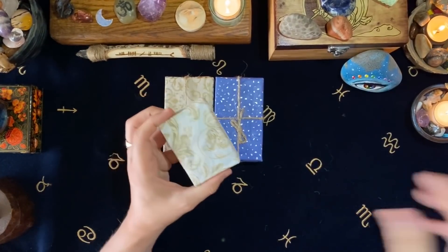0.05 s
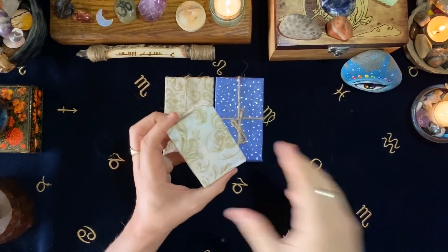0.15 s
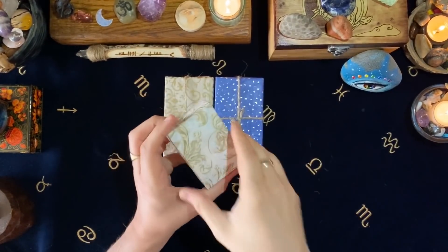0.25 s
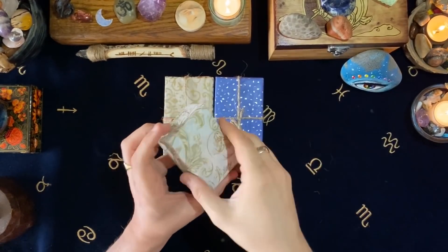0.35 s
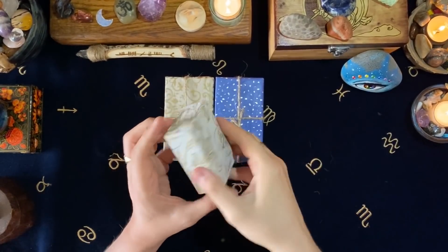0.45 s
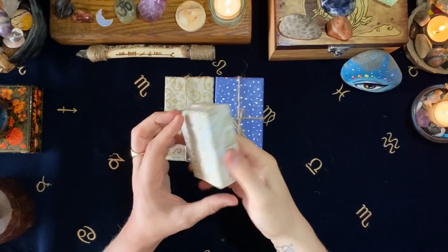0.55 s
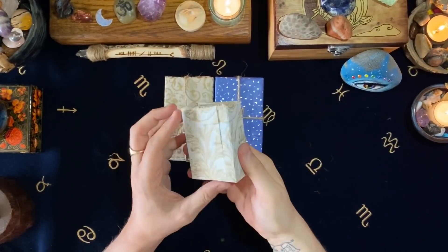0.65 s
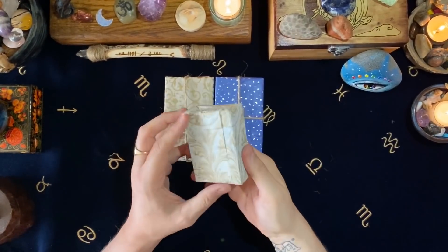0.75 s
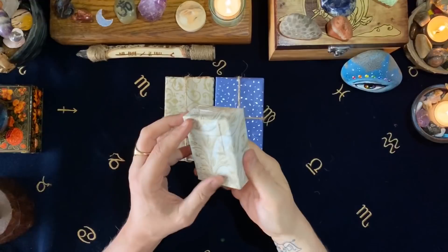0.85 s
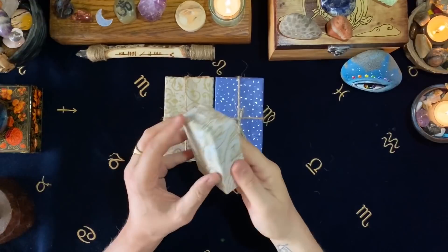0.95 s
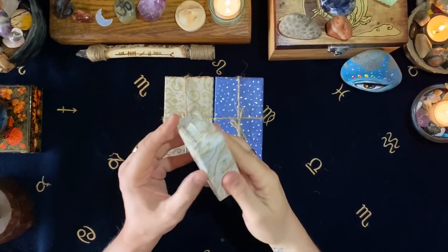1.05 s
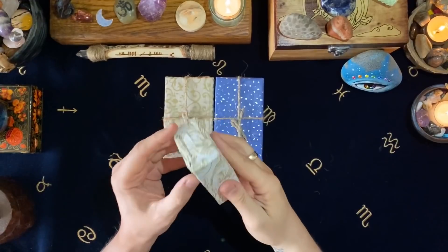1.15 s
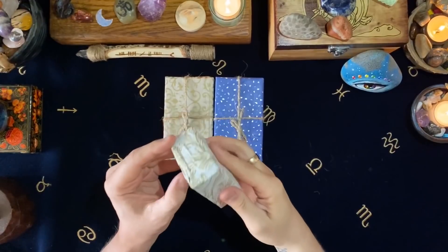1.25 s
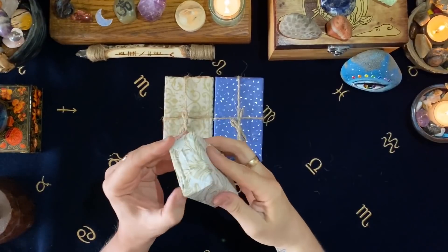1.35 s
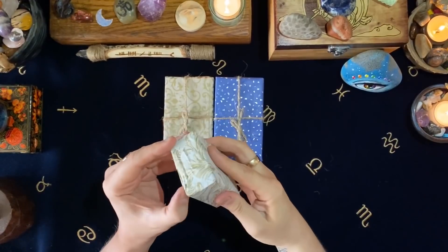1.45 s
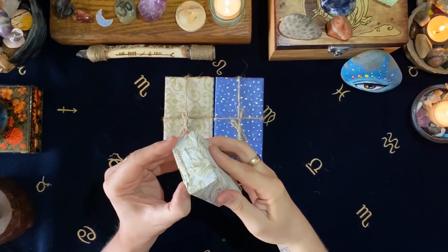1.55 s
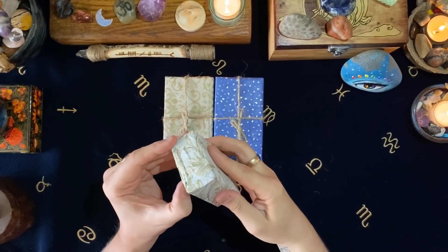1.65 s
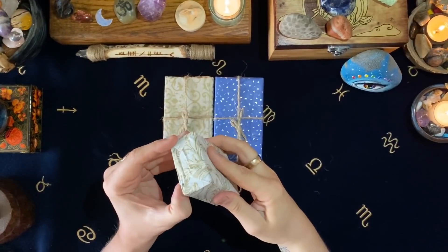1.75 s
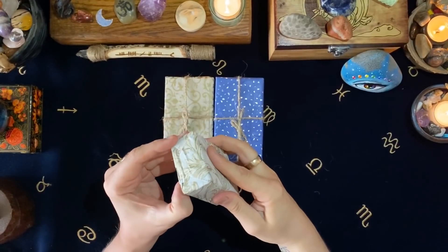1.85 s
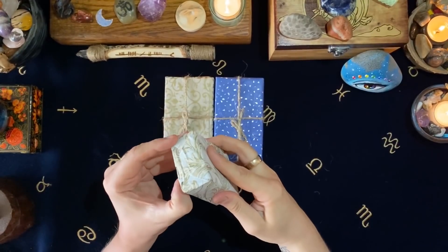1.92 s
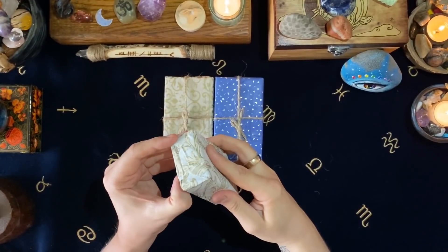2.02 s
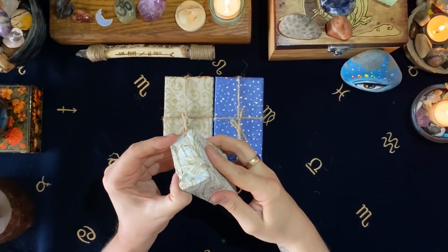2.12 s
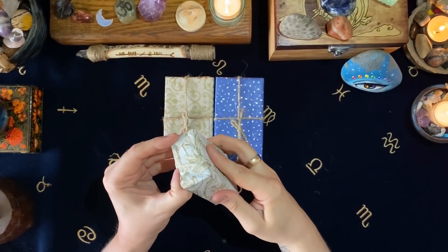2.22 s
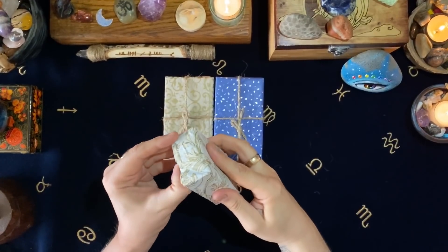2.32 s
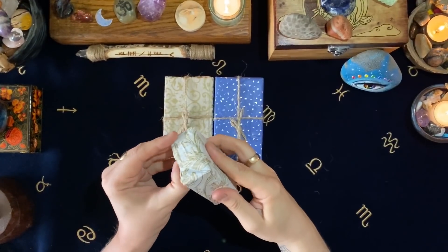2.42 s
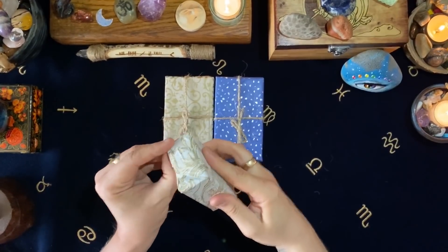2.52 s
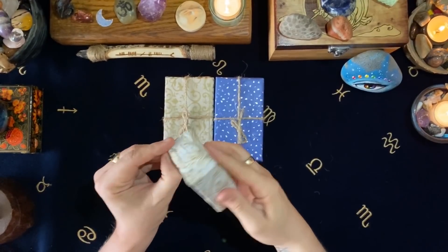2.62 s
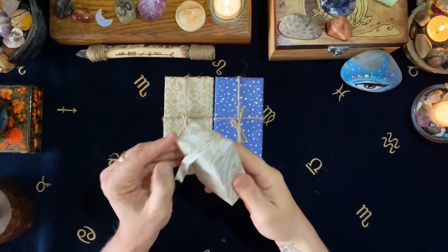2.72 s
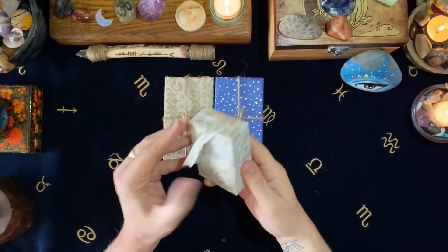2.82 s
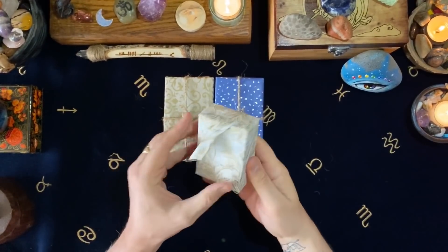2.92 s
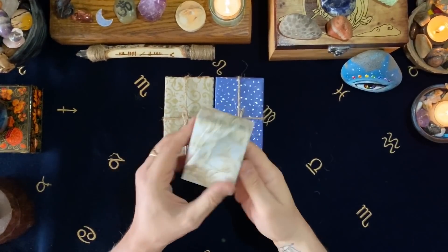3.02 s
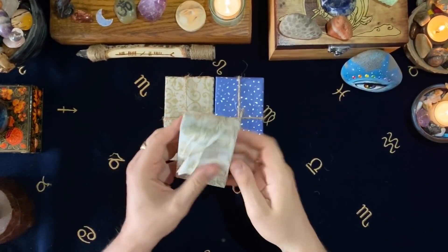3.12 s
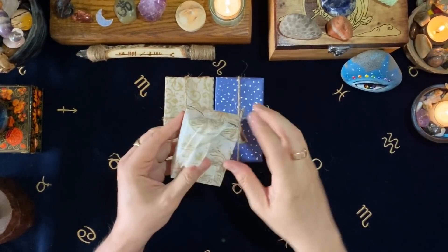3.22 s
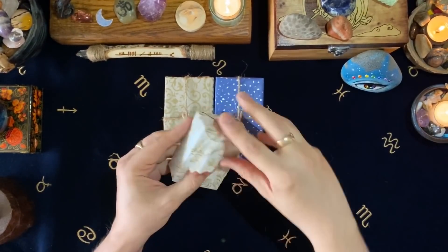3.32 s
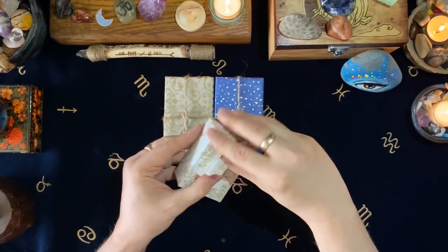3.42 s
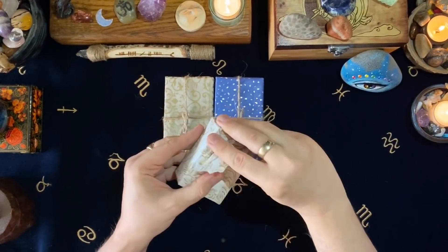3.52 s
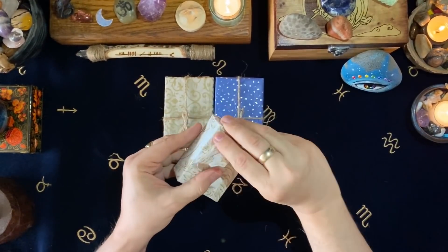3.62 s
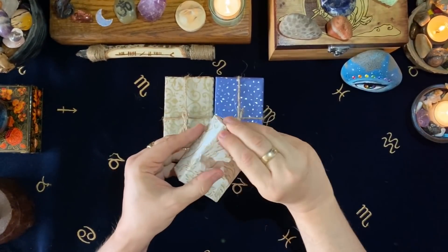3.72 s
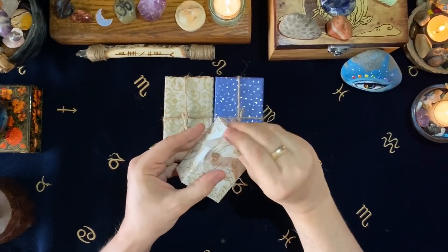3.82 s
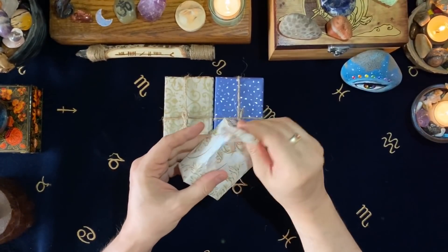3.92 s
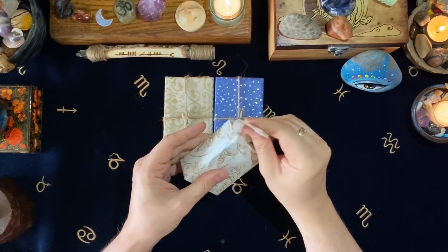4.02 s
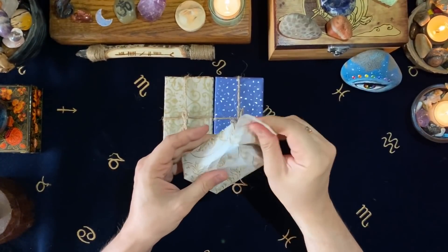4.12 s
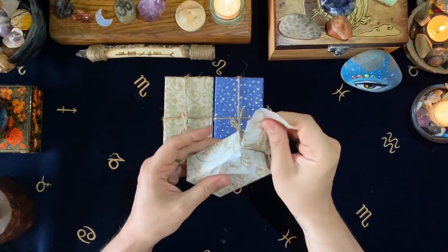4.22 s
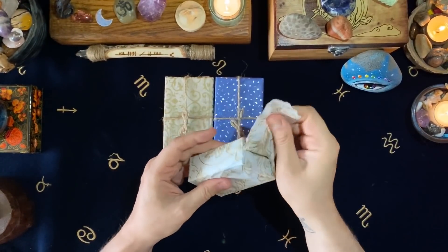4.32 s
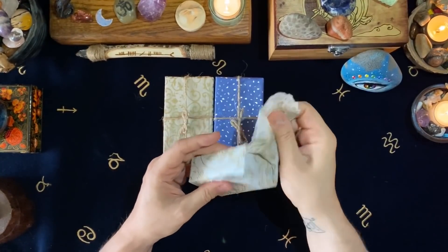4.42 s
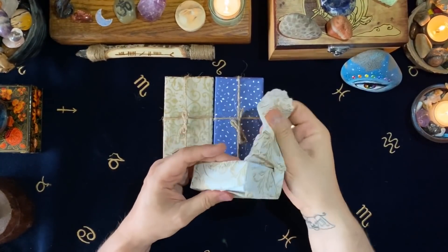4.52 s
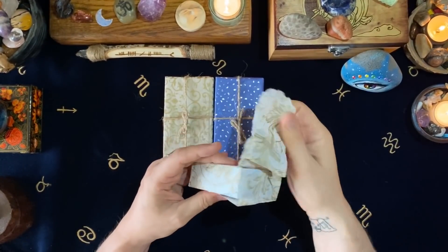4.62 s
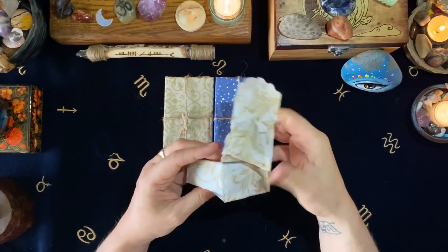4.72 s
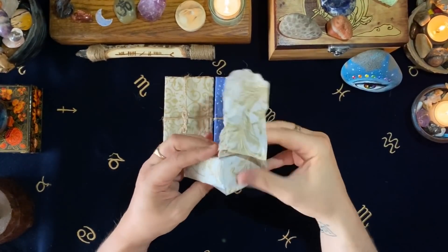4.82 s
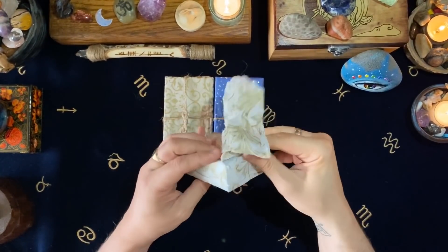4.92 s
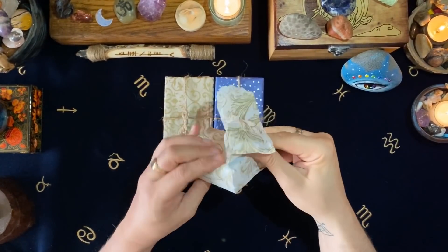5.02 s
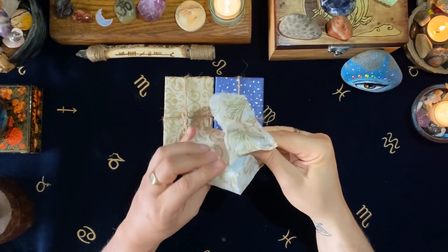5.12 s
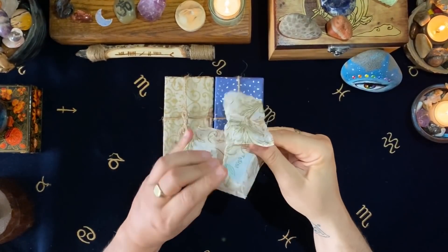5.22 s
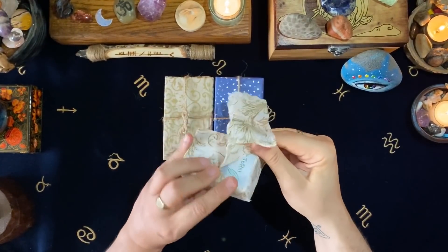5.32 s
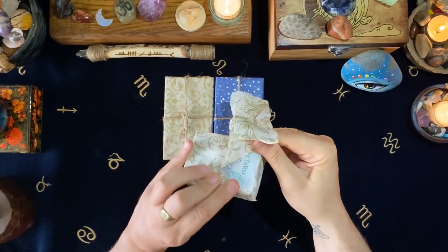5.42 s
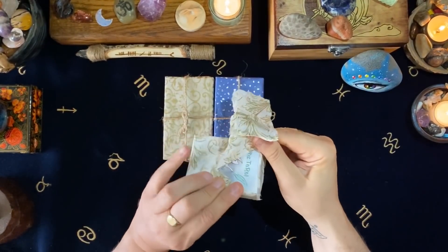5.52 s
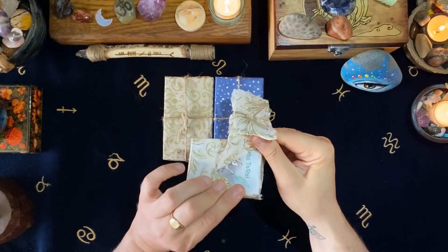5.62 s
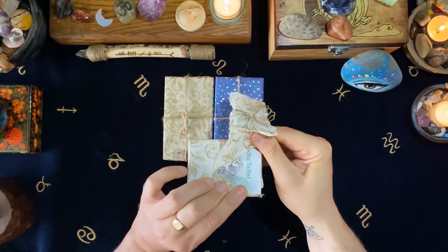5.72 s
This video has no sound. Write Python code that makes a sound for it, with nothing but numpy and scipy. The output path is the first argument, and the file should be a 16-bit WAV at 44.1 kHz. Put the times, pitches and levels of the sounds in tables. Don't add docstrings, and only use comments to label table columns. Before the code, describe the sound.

Two hands handle a small paper-wrapped box. Faint rubbing and light ticks come first, then a dense burst of sharp crackles as folds are picked, a softer pause, irregular tearing with hollow box knocks, and crinkly unfolding. Close stereo phone pickup in a small, quiet, nearly dry room with low rumble.

```python
import sys
import numpy as np
from scipy import signal
from scipy.fft import rfft, irfft, next_fast_len
from scipy.io import wavfile
from scipy.ndimage import uniform_filter1d, minimum_filter1d

SR = 44100
rng = np.random.default_rng(int(sys.argv[2]) if len(sys.argv) > 2 else 0)


def linear_from_db(decibels):
    return 10 ** (np.asarray(decibels, float) / 20)


def dump(signal):
    limited = np.clip(np.atleast_2d(signal).T, -1, 1)
    pcm = np.round(limited * 32767).astype(np.int16)
    wavfile.write(sys.argv[1], SR, pcm)


N = 253575

# (f/Hz, level/dB)
PAPER = [(150, -6.5), (300, -12.5), (600, -10), (1100, -4.5), (2000, -1.5), (3000, -2.5), (4000, -3),
         (5000, -2.5), (6500, 0), (8000, 3), (10000, -5), (12500, -8.5), (15300, -6), (16500, -67)]
# (t/s, peak level/dB, ring pitch f/Hz, knock on the box re peak/dB)
CREASES = [(0.0895, -48, 8700, -19), (0.2437, -46.5, 1590, -25), (0.2532, -47, 2370, -14),
           (0.3038, -34, 1480, -22), (0.4277, -37.5, 3070, -28), (0.5293, -39, 2400, -10),
           (0.5618, -40.5, 2360, -18), (0.64, -41.5, 2480, -7), (0.7094, -40, 3360, -30),
           (0.715, -48, 9000, -30), (0.317, -37, 1520, -19), (0.7931, -37.5, 2540, -17),
           (0.817, -45, 9100, -33), (0.883, -41.5, 2480, -7.5), (1.187, -44, 3560, -25),
           (1.2943, -50, 4240, -25), (1.3937, -48, 3590, -25), (1.4934, -49, 3900, -25),
           (1.4777, -48.5, 3680, -26), (1.5623, -53, 5140, -22), (1.6957, -54.5, 5690, -25),
           (1.771, -42, 5100, -24), (1.781, -38, 4900, -24), (1.8941, -36.5, 5200, -19),
                (1.924, -32, 5250, -25), (1.9789, -40, 1750, -15), (2.0017, -32, 5120, -16),
                (2.0221, -22.5, 5340, -17), (2.0102, -34, 2520, -20), (2.0867, -49, 9500, -21),
                (2.1048, -32, 5460, -28), (2.156, -33.5, 4900, -15), (2.171, -34, 5150, -25),
                (2.22, -28.5, 4950, -18), (2.206, -25.5, 5270, -9), (2.2554, -31, 1880, -13),
                (2.2677, -18.5, 4700, -12), (2.315, -22.5, 6130, -22), (2.3741, -18, 5900, -11.5),
                (2.379, -26, 1760, -15), (2.3918, -17.5, 4630, -13), (2.4139, -16, 5160, -17),
                (2.421, -17, 5950, -31), (2.4338, -9.5, 4700, -31), (2.4432, -11.5, 3320, -17),
                (2.4706, -28, 5500, -26), (2.4865, -18, 5870, -21), (2.602, -35.5, 5250, -24),
                (2.7661, -46, 2310, -13), (2.7965, -45, 2320, -19), (3.1203, -26, 3100, -6),
                (3.2423, -41, 3380, -21), (3.4252, -37, 1710, -23), (3.4458, -26.5, 3900, -24),
           (3.535, -29, 2520, -33), (3.554, -23, 3210, -32), (3.563, -26, 3140, -34),
                (3.676, -27, 3210, -13), (3.6442, -21, 4700, -20), (3.6571, -16, 5800, -12.5),
                (3.694, -19.5, 3260, -15), (3.7113, -17.5, 4760, -5.5), (3.704, -21, 1560, -13),
                (3.721, -22, 3200, -16), (3.728, -23, 1660, -19), (3.7766, -21.5, 6200, -28),
                (3.839, -28, 3300, -20), (3.843, -23.5, 1670, -19), (4.0332, -30.5, 2650, -4.5),
                (4.0685, -31, 6770, -15), (4.0993, -26.5, 2450, -13), (4.1584, -46, 1410, -31),
                (4.1947, -28.5, 1430, -7), (4.259, -30, 2400, -24), (4.275, -23, 2470, -23),
                (4.395, -21.5, 2350, -4), (4.516, -31, 3680, -3.5), (4.5395, -35, 5430, -20),
                (4.5722, -28, 2280, -11), (4.6988, -38.5, 3960, -28), (4.7522, -44, 1330, -22),
           (4.809, -44, 2560, -11), (4.823, -38, 6060, -11), (4.85, -37, 3360, -9),
                  (4.9759, -28, 2160, -22), (4.9995, -28, 4760, -27), (5.0206, -27, 2180, -24),
                  (5.0361, -23, 3500, -11.5), (5.074, -37, 3820, -27), (5.141, -21, 3400, -13),
                  (5.1197, -21, 2120, -12), (5.134, -19, 2320, -3.5), (5.161, -10, 4940, -9.5),
                  (5.221, -37, 3580, -24), (5.2677, -43.5, 2400, -17), (5.2892, -30, 2180, -30),
                  (5.2927, -27, 2170, -32), (5.3765, -25, 3600, -33), (5.4615, -29, 4700, -40),
                  (5.494, -20, 4050, -25), (5.5009, -20, 3570, -13), (5.5311, -26.5, 3878, -9),
                  (5.574, -33.5, 2660, -9), (5.6117, -23, 3465, -33), (5.619, -26, 2210, -17),
                  (5.63, -30, 2000, -20), (5.6733, -24.5, 3440, -20), (5.6772, -22.5, 1430, -19),
                  (5.7047, -27.5, 9100, -32),
           (0.3838, -40, 2130, -14), (0.4407, -46, 2350, -19), (0.4684, -40.5, 2350, -22),
                       (0.5999, -41.5, 2520, -16), (0.6171, -44, 1530, -13), (0.6759, -47, 2470, -23),
                       (0.7601, -49, 2730, -21), (0.8287, -40.5, 4820, -29), (0.9861, -46, 9970, -20),
                       (1.0635, -47.5, 2430, -20), (1.141, -49, 2410, -17), (1.627, -57, 3230, -10),
                       (1.6573, -62, 4010, -7), (1.7236, -61, 5120, -17), (1.8367, -44, 5680, -17),
                       (2.0427, -26, 1610, -19), (2.0868, -38.5, 10300, -22), (2.1482, -34, 5300, -19),
                       (2.1974, -36, 9860, -5), (2.2552, -26, 5340, -19), (2.2674, -20.5, 4500, -18),
                       (2.3986, -25, 5560, -23), (2.4703, -15.5, 5150, -23), (2.5163, -31.5, 5100, -24),
                       (2.5597, -44, 5080, -9), (2.6174, -35, 5060, -23), (2.6675, -44, 3400, -12),
                       (2.7108, -47, 4870, -7), (2.7968, -54, 2350, -23), (2.8094, -42, 9400, -20),
                       (2.8242, -61, 3450, -22), (3.1012, -30.5, 4800, -18), (3.1343, -39, 1610, -18),
                       (3.2093, -47.5, 6140, -21), (3.2241, -43, 3550, -30), (3.2459, -38, 2070, -27),
                       (3.2981, -38, 10790, -27),
           (3.4124, -37.5, 4330, -22), (3.4848, -34.5, 4900, -11), (3.582, -20.5, 3140, -26),
                      (3.6, -26, 2660, -12), (3.6139, -26, 8100, -28), (3.623, -23.5, 2850, -27),
                      (3.7376, -17, 5500, -22), (3.7474, -21, 5800, -20), (3.7661, -27, 6360, -24),
                      (3.8744, -26, 2570, -10), (3.9048, -27.5, 6140, -23), (4.045, -31.5, 2500, -21),
                      (4.069, -38, 2300, -20), (4.083, -33, 5630, -11), (4.0987, -26, 4830, -21),
                      (4.2638, -25, 2420, -8), (4.2914, -21, 5450, -7.5), (4.5394, -29, 5470, -19),
                      (4.6435, -43.5, 5140, -17), (4.69, -45.5, 2820, -14), (4.7898, -40.5, 3420, -19),
                      (4.851, -33, 3380, -19), (4.9198, -29, 2070, -23), (4.968, -34, 2280, -16),
                      (4.987, -37.5, 1877, -20), (5.042, -27, 9600, -16), (5.051, -33.5, 4840, -17),
                      (5.0797, -29.5, 5100, -13), (5.0938, -34, 1300, -15), (5.107, -24, 2258, -18),
                      (5.1725, -15.5, 9000, -8.5), (5.1817, -19, 3470, -15), (5.4766, -26, 4780, -22),
                      (5.5599, -39, 4910, -20), (5.5868, -33.5, 2680, -29), (5.5971, -43, 3490, -26),
                      (5.6483, -25.5, 5100, -14), (5.6571, -36, 3670, -24)]
ALL_CREASES = (CREASES)


def evened(x):
    return x / np.sqrt(np.mean(x ** 2) + 1e-20)


def read(points, hz):
    f, value = np.transpose(points)
    return np.interp(np.log(hz + 1), np.log(f + 1), value)


def colour(x, gain):
    size = next_fast_len(len(x) + 4096)
    spectrum = rfft(x, size) * gain(np.fft.rfftfreq(size, 1 / SR))
    return irfft(spectrum, size)[:len(x)]


def resonate(x, hz, width):
    return signal.lfilter(*signal.iirpeak(min(hz, 16000), hz / width, SR), x)


def below(hz, edge_hz):
    return 1 / (1 + (hz / edge_hz) ** 4)


def drifting(shape, bins, frames):
    field = rng.standard_normal(shape[::-1]).T
    return evened(uniform_filter1d(uniform_filter1d(field, bins, 0), frames, 1))


def rustle():
    effort_db, grip_db, top_db = hands()
    crackle_share = np.clip(0.52 + 0.0021 * (effort_db + 33), 0, 0.95)
    flutter = linear_from_db(2.0 * evened(uniform_filter1d(rng.standard_normal(N), 300)))
    hiss = evened(flutter * rng.standard_normal(N))
    drive = np.sqrt(1 - crackle_share) * hiss + np.sqrt(crackle_share) * crackle()
    body, sheet, top = layers(bend(drive))
    hollow = evened(colour(body, lambda hz: below(hz, 486) * (1 - below(hz, 267))))
    body = body + linear_from_db(0.43 * np.minimum(grip_db + 35.5, 6.0)) * hollow
    flap_s, flap_width_s, shut_hz, open_hz = 4.245, 0.16, 845, 683
    lifted = np.exp(-((np.arange(N) / SR - flap_s) / flap_width_s) ** 4)
    body = body + lifted * (1.1 * resonate(body, open_hz, 90) - 0.4 * resonate(body, shut_hz, 110))
    return linear_from_db(effort_db - 2.5) * sheet + linear_from_db(top_db - 2.5) * top + linear_from_db(grip_db - 4.0) * body


def hands():
    # (t/s, hold/s, effort level/dB, grip on the box re effort/dB, crispness re effort/dB)
    turning = [(0.261, 0.29, -59.5, -5.5, 3), (0.556, 0.21, -60, -13, -8), (0.786, 0.33, -62, -12, 2.5),
               (1.161, 0.053, -55, -7, -9), (1.291, 0.048, -59.5, -12.5, 0.5),
               (1.388, 0.012, -60.5, -24, -12), (1.494, 0.037, -54.5, -15.5, -45),
               (1.55, 0.11, -76, -15, -20)]
    picking = [(1.775, 0.005, -59.5, -7, -8), (1.812, 0.041, -62.5, -1.5, -2),
               (1.889, 0.022, -52, -0.5, -5.5), (2.001, 0.035, -46, -3.5, -8), (2.102, 0.11, -51, -8.5, -1),
               (2.209, 0.094, -47.5, -5.5, 2), (2.258, 0.063, -48, -6.5, 9), (2.376, 0.016, -45.5, -2, 9.5),
               (2.423, 0.035, -34.5, -9.5, 1.5), (2.459, 0.016, -42.5, -3, 7),
               (2.52, 0.091, -58, -4.5, 0.5), (2.598, 0.049, -53, -8, -1), (2.68, 0.16, -63.5, -12.5, -10),
               (2.876, 0.057, -56.5, -9.5, -4.5), (2.951, 0.163, -49.5, -10.5, -5),
               (3.155, 0.011, -57, -3, 7), (3.19, 0.026, -78, -8, -3), (3.239, 0.17, -61.5, -3, 3),
               (3.402, 0.041, -55, -5.5, 1), (3.435, 0.038, -44, -11.5, -9.5),
               (3.47, 0.048, -56.5, -8, -12)]
    tearing = [(3.544, 0.051, -35, -15, 1), (3.62, 0.021, -48, -8, -9), (3.663, 0.013, -39.5, -12, 5),
               (3.7, 0.031, -34.5, -9.5, 0.5), (3.769, 0.087, -41, -11.5, 5), (3.86, 0.09, -45, -14.5, -3),
               (3.961, 0.11, -44.5, -13.5, -4.5), (4.099, 0.056, -44.5, -2.5, 8),
               (4.145, 0.017, -34, -7, -10), (4.19, 0.061, -50, -6.5, 3.5), (4.268, 0.033, -40.5, -1.5, 1),
               (4.327, 0.0076, -42, -2.5, -4), (4.386, .01, -44, -16, -5), (4.4, 0.046, -31.5, -2.5, -0.5),
               (4.49, 0.086, -46, -8, -6), (4.62, 0.2, -65, -5, -2.5)]
    unfolding = [(4.818, 0.013, -49, -0.5, 5), (4.849, 0.1, -44.5, -9, -1), (4.971, .075, -47.5, -4, -2),
                 (5.07, 0.034, -56.5, -5, 7), (5.114, 0.073, -42, -3, 6), (5.21, .07, -60.5, 3, 11),
                 (5.29, 0.013, -40.5, -10, -0.5), (5.33, 0.028, -45.5, -7, -2),
                 (5.379, 0.096, -44, -7.5, 3), (5.532, 0.0057, -48.5, -15, 3),
                 (5.58, 0.049, -48, -20, -0.5), (5.613, 0.02, -43.5, -9, -1), (5.673, 0.012, -49, -7, 4),
                 (5.70, 0.0067, -54.5, -8, 4)]
    rise_db_per_s, sag_db_per_s, fall_db_per_s = 894, 4.5, 458
    settle_db, settle_db_per_s = -26, 128
    t, power = np.arange(0, N + 32, 32) / SR, 1e-12
    for start, hold, effort_db, grip_db, crisp_db in turning + picking + tearing + unfolding:
        since = t - start
        after = np.maximum(since - hold, 0)
        rise_db = rise_db_per_s * np.minimum(since, 0)
        sag_db = sag_db_per_s * np.clip(since, 0, hold)
        release_db = np.maximum(-fall_db_per_s * after, settle_db - settle_db_per_s * after)
        stroke_db = effort_db + rise_db - sag_db + release_db
        power = power + linear_from_db(stroke_db + np.array([[0], [grip_db], [crisp_db]])) ** 2
    return [np.interp(np.arange(N) / SR, t, 10 * np.log10(p)) for p in power]


def crackle(count=24, per_s=700, spread_db=3.0, clump_db=4.0):
    slow = uniform_filter1d(uniform_filter1d(rng.standard_normal(N), 500), 500)
    clump = linear_from_db(clump_db * evened(slow))
    fires = rng.random(N) < per_s * clump / clump.mean() / SR
    size = fires * linear_from_db(spread_db * np.minimum(rng.exponential(1, N), 2.5))
    kind, out = rng.integers(0, count, N), np.zeros(N)
    for k, hz in enumerate(np.geomspace(500, 11000, count)):
        t60 = 0.015 * rng.uniform(0.46, 2.1)
        grain = burst(hz, t60, rng.standard_normal(900), ring=0.65, tick=4.0)
        out += signal.oaconvolve(size * (kind == k), grain / np.linalg.norm(grain))[:N]
    return evened(out)


def burst(hz, t60, noise, ring=0.7, sharp=13.0, tick=1.0, rise_s=0.00024):
    t = np.arange(len(noise)) / SR
    fade = linear_from_db(-60 * t / t60) + tick * np.exp(-t / 0.00069)
    puff = noise * fade * np.minimum(t / rise_s, 1)
    return puff + ring * np.sqrt(sharp) * resonate(puff, hz, hz / sharp)


def bend(x, patchy_db=2.9):
    z = signal.stft(x, nperseg=512, noverlap=384)[2]
    z = z * linear_from_db(patchy_db * drifting(z.shape, 3, 40))
    return signal.istft(z, nperseg=512, noverlap=384)[1][:N]


def layers(x):
    # (f/Hz, width/Hz, level/dB)
    box = [(383, 27, -9), (671, 79, 4.5), (828, 86, 11), (1450, 230, 6), (2480, 610, -2.5), (3450, 590, -3)]
    x = colour(x, lambda hz: linear_from_db(read(PAPER, hz)))
    x = x + 0.94 * sum(linear_from_db(db) * resonate(x, hz, width) for hz, width, db in box)
    body = colour(x, lambda hz: np.sqrt(below(hz, 1200)))
    sheet = colour(x, lambda hz: np.sqrt((1 - below(hz, 2610)) * below(hz, 5760)))
    top = colour(x, lambda hz: np.sqrt(1 - below(hz, 6800)))
    return evened(body), evened(sheet), evened(top)


def holding(hush_db=2.5, wait_s=0.028):
    t = np.arange(N) / SR
    at = np.sort(np.transpose(ALL_CREASES)[0])
    ahead = at[np.minimum(np.searchsorted(at, t), len(at) - 1)] - t
    return linear_from_db(-hush_db * (ahead > 0) * np.exp(-(ahead / wait_s) ** 2))


def snaps():
    out = np.zeros(N + 2000)
    noise = rng.standard_normal((len(ALL_CREASES), 2, 2000))
    low, high = signal.butter(2, 1300, fs=SR), signal.butter(2, 1300, "high", fs=SR)
    for (s, db, hz, knock_db), (a, b) in zip(ALL_CREASES, noise):
        t60 = np.clip(0.024 * (3000 / hz) ** 0.1, 0.004, 0.1)
        crack = signal.lfilter(*high, burst(hz, t60, a, tick=0.25, rise_s=0.0013))
        crack = signal.lfilter(*signal.butter(1, min(4.0 * hz, 18000), fs=SR), crack)
        knock = signal.lfilter(*low, burst(784, 1.5 * t60, b, rise_s=0.0013))
        sound = crack / abs(crack).max() + linear_from_db(knock_db) * knock / abs(knock).max()
        out[round(s * SR):][:2000] += linear_from_db(db) * sound
    return colour(out[:N], lambda hz: linear_from_db(read(PAPER, hz)))


def pats():
    # (t/s, peak level/dB, f/Hz)
    touches = [(0.317, -53, 670), (0.37, -49, 420), (0.431, -57, 511), (0.479, -52.5, 649),
               (0.503, -54, 460), (2.377, -48, 662), (3.123, -46, 362), (4.328, -40, 358),
               (4.414, -27, 404), (4.434, -28.5, 441), (5.036, -38, 681), (5.292, -39, 640),
               (5.418, -43, 438), (5.619, -46, 350), (5.679, -45, 358)]
    rise_s, t60 = 0.0025, 0.054
    out, t = np.zeros(N + 3000), np.arange(3000) / SR
    shape = np.minimum(t / rise_s, 1) * linear_from_db(-60 * t / t60)
    for (s, db, hz), noise in zip(touches, rng.standard_normal((len(touches), 3000))):
        sound = resonate(noise * shape, hz, 0.34 * hz)
        out[round(s * SR):][:3000] += linear_from_db(db) * sound / abs(sound).max()
    return out[:N]


def tail(start):
    # (f/Hz, t/s)
    walls = [(200, 0.4), (1000, 0.02), (4000, 0.18), (12000, 0.076)]
    hz, t, z = signal.stft(rng.standard_normal(SR // 2), SR, nperseg=128)
    fade = linear_from_db(-60 * t / read(walls, hz)[:, None])
    x = signal.istft(z * fade, SR, nperseg=128)[1]
    return np.pad(x / np.linalg.norm(x), (start, 0))


def scatter(x):
    z = signal.stft(x, nperseg=256, noverlap=192)[2]
    z = z * np.exp(3j * drifting(z.shape, 4, 60))
    copy = signal.istft(z, nperseg=256, noverlap=192)[1][:N]
    return copy * np.std(x) / np.std(copy)


def ports(x, other, same):
    # (f/Hz, phase/rad)
    lead = [(0, 0), (700, -.5), (1300, -.2), (2000, 0), (2900, .9), (4400, .9), (5100, 0), (6900, 2.7),
            (7900, 3.5), (9700, 5.8), (11600, 6.7), (12700, 9), (14700, 9.8), (15500, 12.3)]
    # (f/Hz, level/dB)
    tilt = [(100, 0), (450, -1.5), (800, -6.5), (1400, -4), (1800, 0), (2500, -4.5), (3500, -1), (4200, -4),
            (5000, 0), (15000, 0)]
    lead_hz, lead_rad = np.transpose(lead)

    def likeness(hz):
        return np.clip(read(same, hz), 0, 1)

    def side(sign):
        def port(hz):
            turn = np.exp(0.5j * sign * np.interp(hz, lead_hz, lead_rad))
            return turn * linear_from_db(sign * read(tilt, hz) / 2)

        shared = colour(x, lambda hz: port(hz) * np.sqrt((1 + likeness(hz)) / 2))
        differing = colour(other, lambda hz: port(hz) * np.sqrt((1 - likeness(hz)) / 2))
        return shared + sign * differing

    return np.array([side(0.94), side(-1.07)])


def room_air():
    # (f/Hz, level/dB)
    floor = [(20, -29), (40, -2), (60, 0.5), (80, 3.5), (110, -5), (160, -12), (300, -27.5), (700, -34),
             (2000, -44), (4500, -47.5), (7800, -42), (10000, -51), (13500, -46), (15500, -74)]
    # (f/Hz, likeness 0 to 1)
    air_same = [(60, .996), (200, .96), (500, .35), (2000, .6), (4000, .5), (6000, .8), (10500, .9),
                (15000, .8)]
    # (t/s, width/s, level over the tremor/dB)
    leans = [
        (.77, 0.048, -6.5),
        (1.5, 0.58, -2.5),
        (1.85, 0.17, 5.5),
        (2.3, 0.036, 11),
        (2.48, 0.064, 8),
        (3.9, 0.12, 0),
        (4.15, 0.057, 4),
        (4.23, 0.022, -13),
        (4.3, 0.075, 1),
    ]
    air_db, tremor_db, whine_hz, whine_db = -56.5, -54.5, 11100, -89
    a, b = (colour(n, lambda hz: linear_from_db(read(floor, hz))) for n in rng.standard_normal((2, N)))
    scale, t = linear_from_db(air_db) / np.std(a), np.arange(N) / SR
    lean_db = sum(db * np.exp(-((t - s) / width) ** 2) for s, width, db in leans)
    swell = linear_from_db(tremor_db - air_db + lean_db) - 1
    a = a + swell * colour(a, lambda hz: below(hz, 180))
    whine = linear_from_db(whine_db) * np.sqrt(2) * np.sin(2 * np.pi * whine_hz * t)
    return ports(scale * a, scale * b, air_same) + whine


def scene():
    # (f/Hz, likeness 0 to 1)
    paper_same = [(60, 1), (300, .96), (750, .8), (2000, .95), (3000, .84), (4300, .78), (5000, .92),
                  (7300, .9), (10500, .92), (15200, .88)]
    paper = holding() * rustle() + snaps() + pats()
    paper = paper + linear_from_db(-12) * signal.fftconvolve(paper, tail(200))[:N]
    return ports(paper, scatter(paper), paper_same) + room_air()


def joint_stereo(x, from_hz=1500, spiky=11.0, lead=790, wander_db=1.5, faint=24):
    frame = dict(nperseg=2048, noverlap=1024, window="cosine")
    x = np.pad(x, ((0, 0), (lead, 0)))
    hz, t, z = signal.stft([x[0] + x[1], x[0] - x[1]], SR, **frame)
    band = np.searchsorted(np.cumsum(np.linspace(170, 700, num=40)), hz)
    bands = np.arange(band.max() + 1)
    power = np.array([[(abs(c[band == k]) ** 2).sum(0) for k in bands] for c in z])
    under_db = np.where(bands < band[280], 10.5, 7.6)[:, None]
    under_db = under_db + wander_db * rng.standard_normal(power.shape[1:])
    weak = power < power[::-1] * linear_from_db(-2 * under_db)
    quiet = power < np.percentile(power, faint, 2, keepdims=True)
    weak |= quiet & (bands >= band[600])[:, None]
    fast = uniform_filter1d(np.diff(x[0]) ** 2, 128)
    before = np.roll(uniform_filter1d(fast, 1024), 640)
    jump = -minimum_filter1d(-fast / (abs(before) + 1e-12), size=1024)
    attack = jump[np.minimum((t * SR).astype(int), N - 2)] > spiky
    z = z * ~(weak[:, band] & (hz > from_hz)[:, None] & ~attack)
    mid, side = signal.istft(z, SR, **frame)[1][:, lead:lead + N]
    return np.array([mid + side, mid - side]) / 2


def band_limit(x):
    return signal.sosfilt(signal.butter(12, 16650, fs=SR, output="sos"), x)


def record(dry):
    limited = [colour(x, lambda hz: np.clip((15950 - hz) / 350, 0.003, 1)) for x in dry]
    mix = joint_stereo(np.array(limited))
    return band_limit(mix)


dry = scene()
out = record(dry)
dump(out)
```